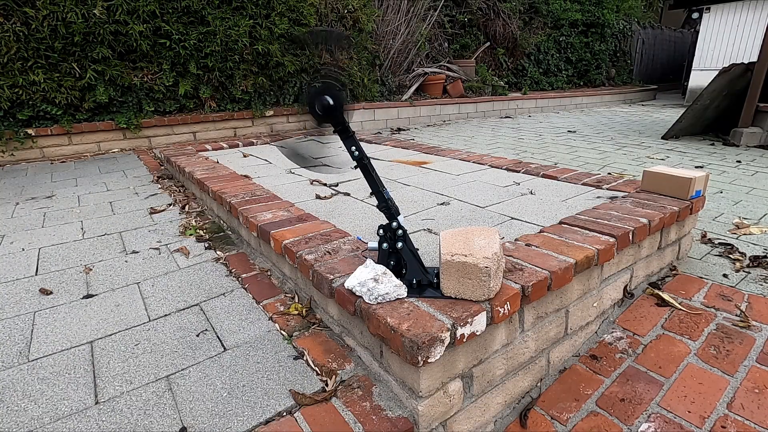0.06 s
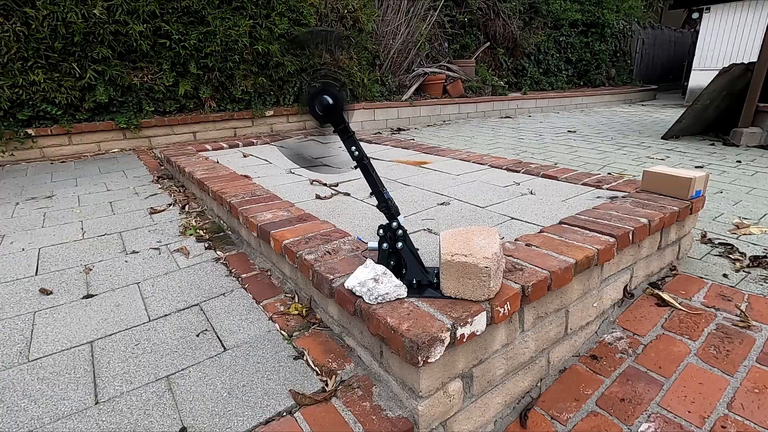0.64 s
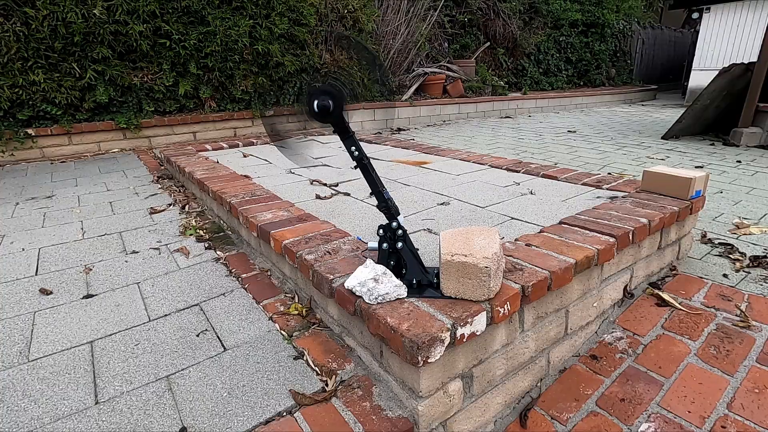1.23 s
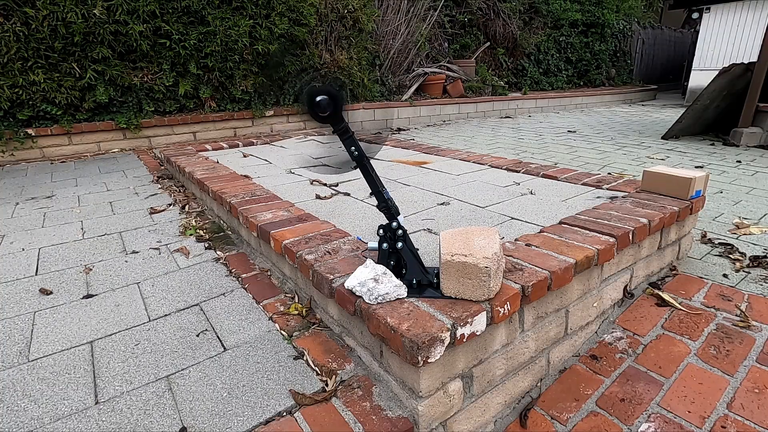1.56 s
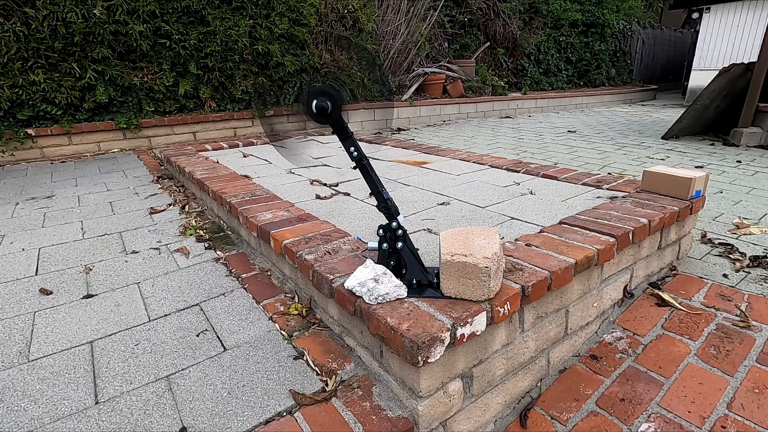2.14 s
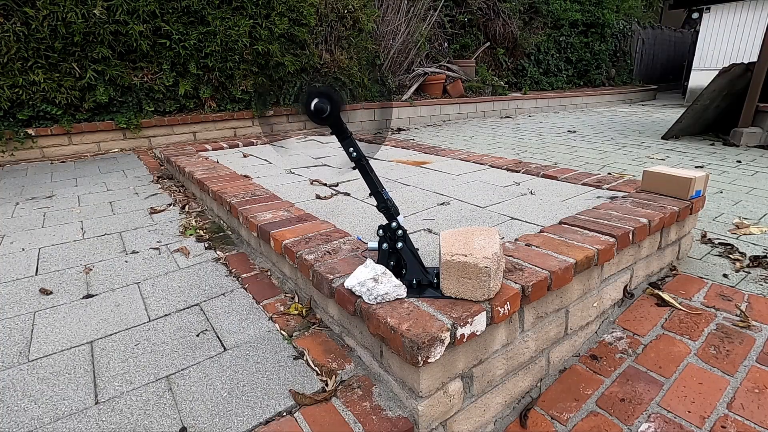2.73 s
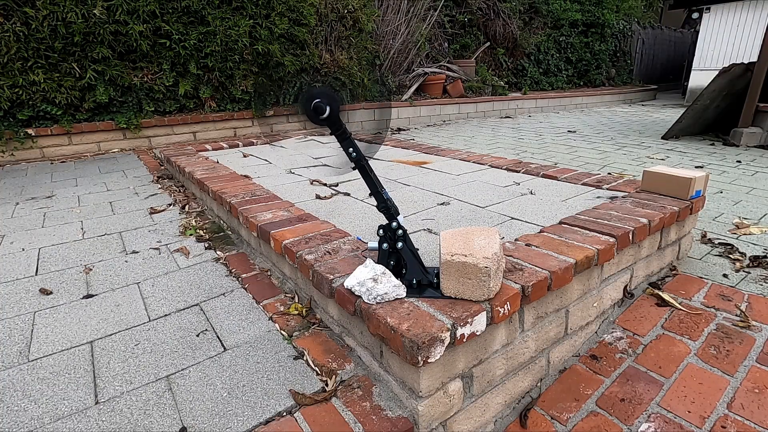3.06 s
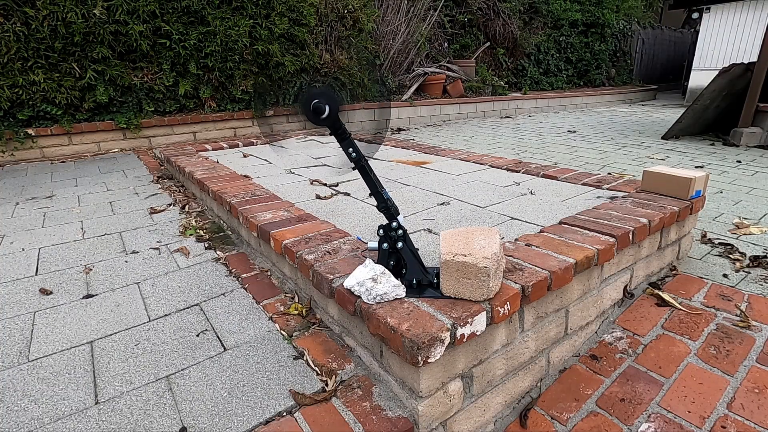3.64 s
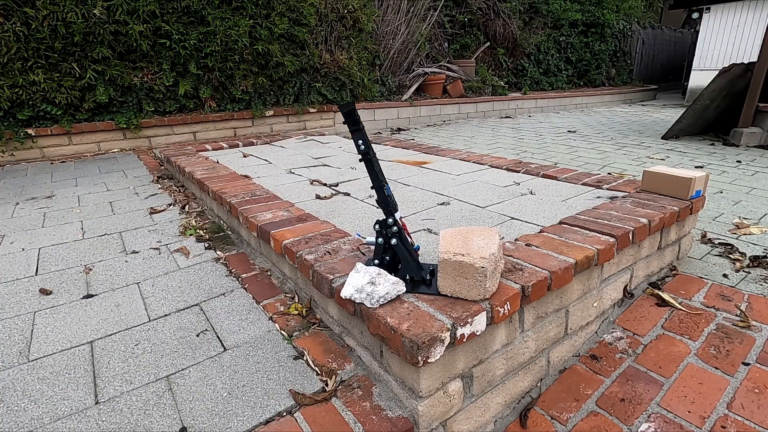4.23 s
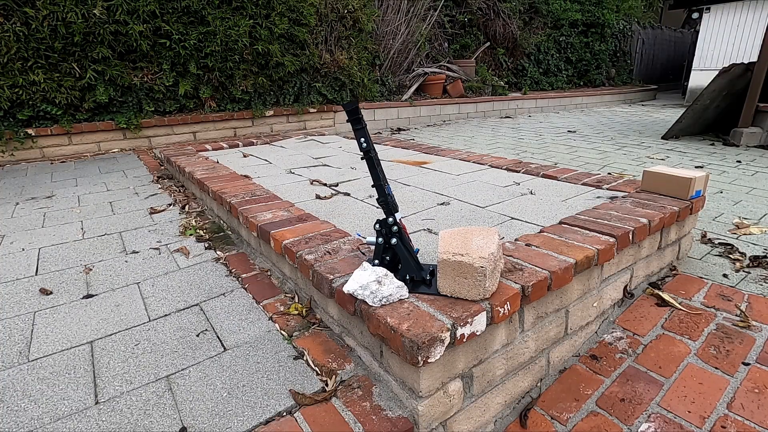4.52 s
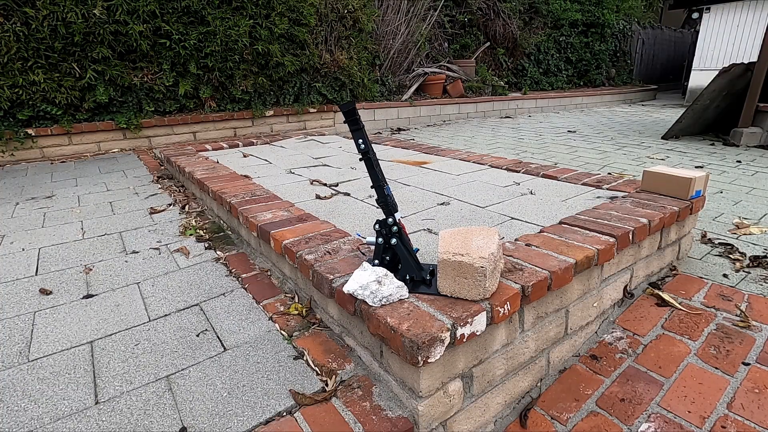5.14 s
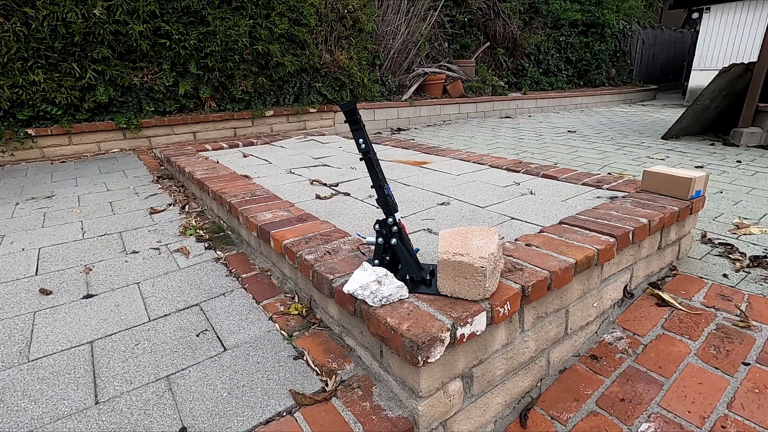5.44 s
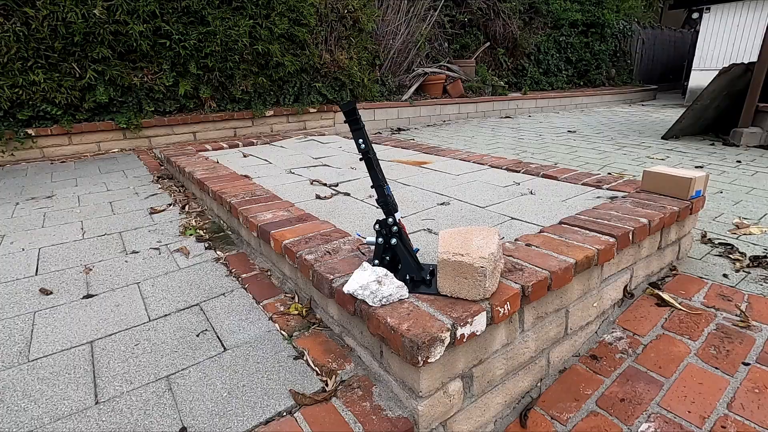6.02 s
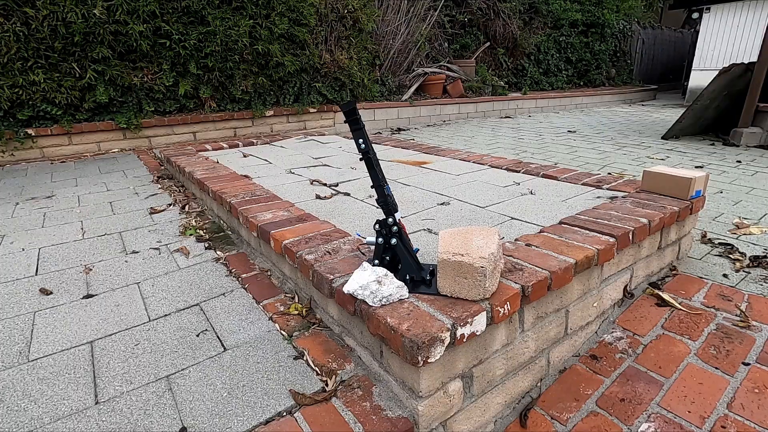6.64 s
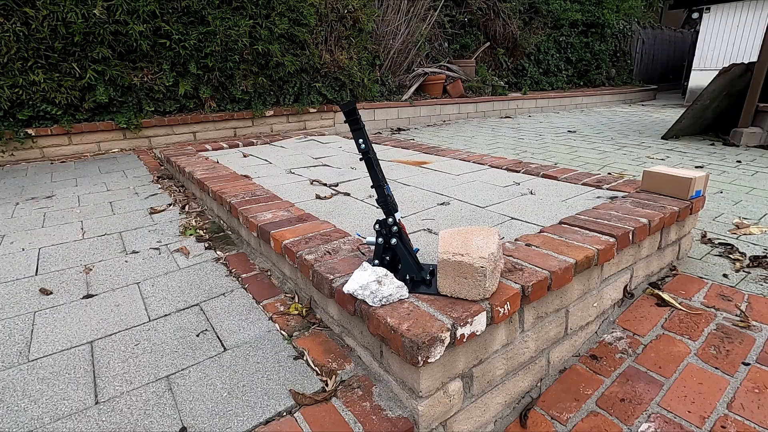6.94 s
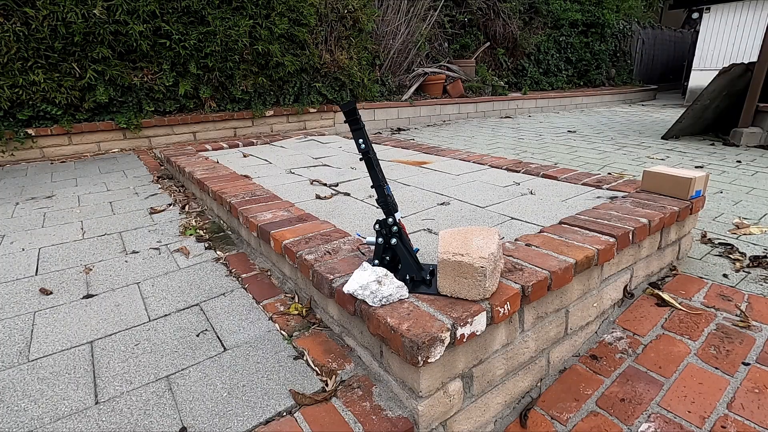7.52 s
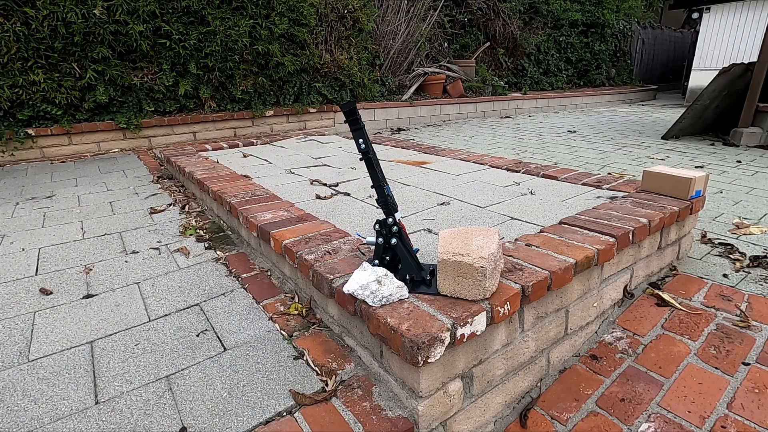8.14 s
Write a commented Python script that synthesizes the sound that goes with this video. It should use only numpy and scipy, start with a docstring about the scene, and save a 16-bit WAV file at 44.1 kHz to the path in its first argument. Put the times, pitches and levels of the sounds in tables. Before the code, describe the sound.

A motorised spinning bar hums and whines faster, cracks off its mast, and its pieces clatter over brick and paving outdoors.

```python
"""Spinning bar breaks up in a yard

A two-armed bar on a motorised mast spins up in a paved yard, heard on a spaced pair of microphones:
blade hum, torn air, motor whine and a rattle once a turn. The rattle grows until the hub cracks off;
the mast shudders and the pieces clatter over brick and paving. Walls answer each blow, dry leaves stir,
and a low, distant rumble remains."""
import sys
import numpy as np
from scipy import signal
from scipy.fft import rfft, irfft, next_fast_len
from scipy.io import wavfile
from scipy.ndimage import map_coordinates

SR = 44100
rng = np.random.default_rng(int(sys.argv[2]) if len(sys.argv) > 2 else 0)


def persist_wave(psi):
    """Save psi, clipped to +-1, as 16-bit WAV."""
    counts = np.round(np.clip(psi, -1, 1) * 32767).astype(np.int16)
    wavfile.write(sys.argv[1], SR, np.atleast_2d(counts).T)


N = 369558
TIME = np.arange(N) / SR
START_HZ = 45.39  # shaft turns per second at the outset
FAIL_S, BREAK_S = 4.1, 4.19  # the hub gives way, then comes off
FALL_DB_PER_S = 79.5  # air and rattle fade once it gives way

# Spectrum of the grinding hub: (frequency [Hz], density [dB])
GRIND = [(600, -20.5), (1500, -5), (2700, 8.5), (3550, 8.5), (4200, -2.5), (5200, -6), (7200, -9.5),
         (8600, -9), (9600, -26), (12500, -31), (14500, -44), (15500, -54)]
# How alike the two microphones hear a noise: (frequency [Hz], correlation [0-1])
LIKENESS = [(60, 0.84), (180, 0.98), (550, 1), (1650, 0.98), (4970, 0.75), (15000, 0.33)]


def rotor():
    """Hum, whine, air and rattle follow the shaft and cut out as the hub comes off."""
    # Balance at the microphones: (frequency [Hz], left minus right [dB])
    balance = [(60, -3.5), (110, 0.5), (200, -1.5), (380, -1.5), (700, -1.5), (1290, -2), (2380, -1.0),
               (4400, -1), (8120, -5), (15000, -3.5)]
    speed = shaft_speed()
    angle = 2 * np.pi * np.cumsum(speed) / SR
    wear = np.exp(np.minimum(TIME - FAIL_S, 0) / 0.067)  # runs away from 0 to 1
    sound = (blade_hum(speed, angle, wear) + motor_whine(angle)
             + torn_air(speed, angle, wear) + hub_rattle(speed, angle, wear))
    held = np.interp(TIME, [BREAK_S - .03, BREAK_S, BREAK_S + .02], [1, .6, 0])
    return filtered(held * sound, lambda hz: amp(along(balance, hz) * np.array([[.5], [-.5]])))


def shaft_speed(creep_hz_per_s=1.83, throttle_s=1.56, top_hz=61.96, spin_up_s=1.05):
    """Turns per second: a slow creep, then at full throttle an approach to top speed."""
    creep = START_HZ + creep_hz_per_s * np.minimum(TIME, throttle_s)
    return top_hz + (creep - top_hz) * np.exp(-since(throttle_s) / spin_up_s)


def blade_hum(speed, angle, wear):
    """Each arm pushes a pressure wave; turbulence shakes the partials in phase and level."""
    # Partials, the half order from imbalance: (multiple of blade rate, level [dB], flutter [rad])
    partials = [(.5, -21, 0.33), (1, -2, 0.029), (2, -4.5, 0.073), (3, -8, .2), (4, -6, 0.8), (5, -3.5, .9),
                (6, -6, 0.16), (7, -16, 0.47), (8, -18.5, 0.35), (10, -16, 0.53)]
    # Hum against shaft speed: (speed [turns/s], level [dB])
    loudness = [(45.5, -32), (48.5, -28.5), (54.6, -26), (60.6, -27)]
    hum_db = along(loudness, speed) - 449.5 * since(FAIL_S)
    throb_db = 2 * wobble(23.98)  # the bar cuts its own wake
    choke_db = 2 * wear ** 2  # the wobbling bar loses its upper partials
    hum = 0
    for k, db, flutter in partials:
        level_db = hum_db + db - k * choke_db + min(flutter / 0.46, 1) * throb_db
        gain = amp(level_db + 2 * flutter * wobble(16)) * np.sqrt(2)
        hum += gain * np.sin(2 * k * angle + rng.uniform(0, 2 * np.pi) + flutter * wobble(30))
    return hum


def motor_whine(angle, switching_hz=8030, surge_s=1.74):
    """Magnetic whine swells as the motor pulls, over the tones of its speed controller."""
    # Magnetic orders: (multiple of shaft rate, level [dB], swell under load [dB])
    orders = [(42, -47, 11), (45.9, -55.5, 5), (50.1, -51, 10), (80, -59, 11), (83.8, -57, 17.5)]
    # Steady controller tones: (frequency [Hz], level [dB])
    tones = [(7340, -68), (7840, -71), (7982, -67), (8031, -62), (8680, -64.5), (8870, -64.5), (13700, -79)]
    pull = np.exp(-((TIME - 1.91) / 0.45) ** 2)
    whine = sum(amp(db + swell_db * pull + 1.5 * wobble(25)) * np.sin(k * angle + .45 * wobble(60))
                for k, db, swell_db in orders)
    # switching beats with commutation: a falling tone that surges as the throttle opens, then dies
    beat_phase = 2 * np.pi * switching_hz * TIME - 84 * angle
    beat_db = -52 + 14.5 * np.exp(-((TIME - surge_s) / 0.18) ** 2) - 90 * since(surge_s)
    beat = amp(beat_db + 1.9 * wobble(12.7)) * np.sin(beat_phase + .5 * wobble(50.2))
    controller = sum(amp(db + 3 + 2 * wobble(6)) * np.sin(2 * np.pi * hz * TIME + 1.3 * wobble(50))
                     for hz, db in tones)
    return whine + beat + controller


def torn_air(speed, angle, wear, db_per_octave=8.5):
    """Eddies pass faster as the bar speeds up, and swish as each arm comes round."""
    # Eddies at the starting speed: (frequency [Hz], density [dB])
    spectrum = [(25, -25.5), (150, -11), (270, -4.5), (370, -1.4), (490, -5), (620, -7.5), (780, -10),
                (920, -5), (1030, -8.5), (1220, -9.5), (1310, -5.5), (1450, -12), (1800, -15),
                (2700, -20.5), (3800, -26.5), (5200, -34.5), (8000, -38.5), (12000, -49), (14000, -52.5),
                (16000, -62)]
    # Modes of the shaking mast head: (frequency [Hz], width [Hz], level [dB])
    head_modes = [(2656, 110, 0), (1350, 75, 2.5), (8650, 400, -13)]
    travel = np.cumsum(speed / speed[0])
    wake = noise(spectrum, LIKENESS, int(travel[-1]) + 1)
    eddies = np.array([map_coordinates(side, [travel]) for side in wake])
    swish = unit(amp(.6 * np.cos(2 * angle) + 0.8 * np.cos(4 * angle) + 0.7 * wobble(20)))
    head = amp(-15.5) * resonate(noise(GRIND, LIKENESS), head_modes)
    air_db = -26 + db_per_octave * np.log2(speed / START_HZ) - 4 * wear - FALL_DB_PER_S * since(FAIL_S)
    return amp(air_db) * swish * (eddies + head)


def hub_rattle(speed, angle, wear, db_per_octave=18, loose_hz=(53.5, 56.5)):
    """Near top speed the hub works loose and ticks once a turn over a steady grind."""
    # The hub's tick: (frequency [Hz], density [dB])
    tick_spectrum = [(600, -26), (1500, -9), (2600, 1), (3150, 0), (3550, 7), (4000, -2), (4600, -7),
                     (5700, -6.5), (6800, -14), (8600, -14.5), (10000, -27), (15000, -54)]
    looseness = np.interp(speed, loose_hz, [.15, 1])
    age_s = (angle / (2 * np.pi) % 1) / speed
    ticks = 4.1 * looseness * (1 - np.exp(-age_s / .0003)) * np.exp(-age_s / .0017) * amp(wobble(60))
    grind = .55 * amp(1.3 * wobble(250))
    hub_db = -42 + db_per_octave * np.log2(speed / START_HZ) + 8 * wear - FALL_DB_PER_S * since(FAIL_S)
    return amp(hub_db) * (grind * noise(GRIND, LIKENESS) + ticks * noise(tick_spectrum, LIKENESS))


def hub_cracks(ring_t60=0.034, snap_t60=0.0051):
    """The hub tears in a run of cracks, each a hard snap and a short ring."""
    # Cracks: (time [s], level [dB])
    cracks = [(3.883, -21), (3.966, -19), (3.973, -18), (3.982, -17), (3.999, -16), (4.033, -14.5),
              (4.047, -14), (4.057, -14.5), (4.068, -12), (4.0846, -11.5), (4.094, -14), (4.103, -16),
              (4.111, -12.5), (4.118, -14), (4.1298, -7), (4.1634, -8.5), (4.1747, -11), (4.182, -8.5),
              (4.23, -18), (4.25, -27.5)]
    spectrum = [(200, -13), (900, -2.5), (2400, 2), (4500, -4), (8500, -15), (15000, -32.5), (17000, -49)]
    out, t = np.zeros((2, N)), TIME[:SR // 4]
    for s, db in cracks:
        fade = amp(-60 * t / ring_t60) + amp(-1.5 - 60 * t / snap_t60)
        crack = amp(db - 5) * fade * noise(spectrum, LIKENESS, len(t))
        add(out, s, crack)
        add(out, s, amp(-15) * wall_echo(crack))
    return out


def mast_shudder(sway_hz=79.3):
    """At each jolt the mast's joints thud, its bending modes ring and it recoils on its base."""
    # Jolts: (time [s], shudder [dB], sway [dB], t60 [s])
    jolts = [(4.121, -15.5, -27, .16), (4.135, -19, -32, .16), (4.165, -11.5, -28, .12),
             (4.178, -18, -28, .08), (4.191, -27, -15, 0.083), (4.231, -12.5, -26, 0.047),
             (4.247, -31, -36, .2)]
    # Bending modes: (frequency [Hz], level [dB])
    bending = [(171, -5), (208, -5.5), (273, -11)]
    thud_spectrum = [(25, -11), (70, 1), (220, 1.5), (350, -11), (600, -33.5), (2000, -88.5)]
    out, t = np.zeros((2, N)), TIME[:SR // 4]
    for s, db, sway_db, t60 in jolts:
        thud = amp(-6.5 - 60 * t / t60) * noise(thud_spectrum, [(100, 0.88)], len(t))
        shudder = ring([(hz, level, t60) for hz, level in bending], t, scatter_db=1, drift=3)
        sway = amp(sway_db - 60 * (t / t60) ** 2) * np.sin(2 * np.pi * sway_hz * t)
        add(out, s, (1 - np.exp(-t / 0.0025)) * (amp(db) * (shudder + thud) + sway))
    return out


def falling_pieces():
    """Each piece clacks with a colour set by its size, knocks the ground and wakes the walls."""
    # Landings: (time [s], level [dB], centre [Hz], knock [dB], left minus right [dB], echo [dB])
    landings = [(4.285, -27, 1290, -12.5, -3, -2.5), (4.311, -36, 2200, -18, 0, -10),
                (4.348, -30, 2380, -19, 1.5, -20), (4.393, -20, 1750, -27, -4.5, -9),
                (4.409, -13.5, 2100, -24, -1.5, -29.5), (4.453, -35, 3800, -4, 0, -12),
                (4.483, -21, 2200, -16, 0, -17), (4.505, -11.5, 3610, -25.5, 7.5, -5.5),
                (4.566, -34.5, 1000, -16, 0, -12), (4.59, -23.5, 1700, -16, -1, -10.5),
                (4.599, -21.5, 3600, -19, -1.5, -6), (4.637, -33.5, 3800, -20, -0.5, -8),
                (4.725, -21.5, 1590, -17, -1, -7), (4.746, -31, 2400, -15, -1, -4),
                (4.791, -33.5, 2510, -12, 0.5, -5.5), (4.949, -45, 2210, -11, 2, -20),
                (4.999, -46, 4800, -25, -0.5, -8), (5.259, -26, 1200, -7, -2, -9),
                (5.271, -21, 1450, -7, -2, -2), (5.272, -23.5, 3400, -22, -2, -3),
                (5.3, -35, 1150, -3, -1, -6), (5.353, -36, 1200, -9, -1, -8),
                (5.394, -20, 1600, -10, 1, -9), (5.403, -31, 1900, 3, -1, -5.5),
                (5.417, -34.5, 1400, 2.5, -1, -5), (5.455, -37, 1300, 1.5, -1, -7),
                (5.566, -46.5, 3600, -20, -0.5, -3.5), (5.633, -37, 2500, -25, 2.5, -11.5),
                (5.73, -35, 1500, -13, -4.5, -5), (5.745, -28, 1900, -9, -2, 3.5),
                (5.951, -35.5, 2600, -13, -5.5, -17), (6.044, -33.5, 2620, -13, -7, 1),
                (6.057, -38, 3400, -14.5, -6, -7), (6.121, -43, 2400, -15, -3.5, -8),
                (6.157, -26.5, 1400, -18.5, 0.5, -17.5), (6.162, -13.5, 1750, -14, -3.5, -9),
                (6.293, -28.5, 2700, -14, -4.5, -3.5), (6.398, -28.5, 2500, -7, -4.5, -6),
                (6.5, -35.5, 2020, -0.5, -.5, 0.5), (6.684, -33, 2490, -5, -3, -7),
                (6.71, -36.5, 1800, -5, -3, -5.5), (6.869, -34, 2420, -12, -3.5, -5),
                (6.932, -43, 2400, -11, -3, -4.5), (7.194, -48, 2210, -16, -3.5, -8),
                (7.247, -41, 2400, -12, -.5, -11)]
    ground = [(50, -4), (180, 7), (480, -3), (750, -13), (1200, -18), (4000, -67.5)]
    out, t = np.zeros((2, N)), TIME[:SR // 4]
    for s, db, hz, knock_db, lr_db, echo_db in landings + chips(count=5):
        t60 = 0.036 * 2 ** ((-24 - db) / 25.5)  # softer blows last longer
        crunch = unit(amp(2 * wobble(700)[:len(t)]))  # many tiny contacts
        clack = amp(-60 * t / t60) * crunch * noise(fragment(hz), [(800, 0.85), (5000, 0.91)], len(t))
        knock = amp(knock_db - 1.5 - 60 * t / 0.06) * noise(ground, [(200, 1)], len(t))
        blow = amp(db - 3) * (clack + knock) * (1 - np.exp(-t / 0.0003))
        add(out, s, placed(blow, lr_db))
        add(out, s, amp(echo_db + 1.5) * wall_echo(blow) * panned(-1))
    return out


def chips(count, start_s=4.8, span_s=0.32):
    """Landing rows for light chips that patter down at random; bigger ones are louder and lower."""
    return [(start_s + span_s * (k + when) / count, -53.5 + 4 * (size - .5), 4790 * 2 ** (.5 - size),
             -27, 8 * (side - .5), -3) for k, (when, size, side) in enumerate(rng.random((count, 3)))]


def fragment(hz, ring_db=5, relative_width=0.055):
    """The spectrum of one piece: a hump set by its size, with a few resonances of its own."""
    hump = [(hz / 8, -26), (hz / 3.8, -15), (hz / 1.85, -1), (hz, 0),
            (hz * 2, -5.5), (hz * 3, -16), (hz * 5, -28), (hz * 9, -46)]
    grid = np.geomspace(100, 16000, 400)
    modes = hz * np.array([.62, 1, 1.6, 2.4]) * np.exp(.07 * rng.standard_normal(4))
    peaks = sum(1 / (1 + ((grid / mode - 1) / relative_width) ** 2) for mode in modes)
    return np.transpose([grid, along(hump, grid) + ring_db * peaks])


def steel_clink():
    """Off to the left a small steel part strikes brick; brief chatter roughens its ring."""
    # Strikes: (time [s], level [dB], left minus right [dB])
    strikes = [(5.655, -9, 9.5)]
    # The part's modes: (frequency [Hz], width [Hz], level [dB])
    modes = [(1730, 90, -15), (2440, 70, -16), (2720, 90, -16), (3690, 75, 3), (4090, 200, -9),
             (4580, 160, -13), (5800, 190, -14), (6680, 130, -11.5), (8440, 300, -22)]
    spectrum = [(400, -34), (800, -16), (1500, 9.5), (3200, 7), (3850, 16),
                (5300, -2), (9000, -13), (15000, -19), (17000, -44.5)]
    low_cut = signal.butter(4, 1100, "high", fs=SR, output="sos")  # too small to radiate bass
    out, t = np.zeros((2, N)), TIME[:SR // 2]
    for s, db, lr_db in strikes:
        contact = amp(db - 0.5 - 60 * t / 0.0045) * noise(spectrum, [(3000, 0.43)], len(t))
        tick = signal.sosfilt(low_cut, contact)
        chatter = (t == 0) + amp(-28 - 60 * t / .07) * rng.standard_normal(len(t))
        clink = amp(db - 29.5) * signal.sosfilt(low_cut, resonate(chatter, modes))
        add(out, s, (tick + clink) * panned(lr_db))
        add(out, s, (amp(-8.5) * wall_echo(clink) + amp(-4.5) * wall_echo(tick)) * panned(3))
    return out


def thrown_bar():
    """The heavy bar comes down right of centre, clangs, bounces and skids on the paving."""
    # Bounces: (time [s], skid [dB], skid t60 [s], clang [dB])
    bounces = [(6.161, -18.5, .11, -23), (6.187, -25.5, .15, -31), (6.225, -32.5, .15, -37),
               (6.292, -35, .18, -50), (6.332, -34, 0.2, -50), (6.387, -34, 0.16, -45.5),
               (6.415, -35.5, .14, -48), (6.51, -43.5, .2, -45.5), (6.62, -44, 0.17, -53),
               (6.64, -45, .12, -49), (6.684, -38.5, .2, -41), (6.869, -47.5, .15, -55)]
    # Modes while scraping: (frequency [Hz], width [Hz], level [dB])
    skid_modes = [(1222, 95, -2.5), (1740, 640, -6.5), (2550, 260, -1), (2745, 130, 2.5), (3550, 260, -4.5),
                  (4100, 260, -4), (5240, 800, -10), (7710, 3200, -17.5)]
    # Free ring after a blow: (frequency [Hz], level [dB], t60 [s])
    clang_modes = [(1120, -3, .05), (1228.4, -4, .15), (1480, -3, .045), (2720, -5, .11)]
    grit_spectrum = [(300, -22), (700, -15), (1100, -2), (9000, 0), (15000, -3)]
    out, t = np.zeros((2, N)), TIME[:SR // 2]
    for s, db, t60, clang_db in bounces:
        catches = unit(amp(3 * wobble(500) + 3.5 * wobble(130))[:len(t)])
        grit = catches * noise(grit_spectrum, LIKENESS, len(t))
        skid = amp(db - 60 * t / t60) * resonate(grit, skid_modes)
        clang = amp(clang_db) * ring(clang_modes, t, scatter_db=1.5, drift=9)
        add(out, s, placed(skid + clang, -2.5))
        add(out, s, amp(-3) * wall_echo(skid + clang) * panned(-1.8))
    return out


def wall_echo(sound, build_s=0.0023):
    """A fresh diffuse tail that builds up as the yard's walls reply."""
    # Decay of the yard: (frequency [Hz], t60 [s])
    decay = [(200, 0.65), (1200, 0.51), (4000, 0.62), (12000, 0.4)]
    diffuse = noise([(100, 0.0019), (15000, 0.011)], [(300, 0.97), (1500, 0.26)], SR * 3 // 4)
    hz, t, bands = signal.stft(diffuse, SR, nperseg=256)
    envelope = amp(-60 * t / along(decay, hz)[:, None]) * (1 - np.exp(-t / build_s))
    tail = signal.istft(bands * envelope, SR, nperseg=256)[1]
    return signal.fftconvolve(np.atleast_2d(sound)[:1], tail / np.linalg.norm(tail[0]), axes=1)


def dry_leaves(rise_s=0.036, floor_db=-67.5):
    """Leaves and grit crackle in short rustles after the break, over a faint hiss."""
    # Rustles: (time [s], level [dB], t60 [s])
    rustles = [(4.49, -43, 0.7), (5.27, -33.5, 0.75), (5.76, -46.5, 1.7), (6.29, -36, 1.47),
               (6.8, -56, 1.5), (7.35, -57, 2.3), (8.09, -56.5, 1.14)]
    # Leaf crackle: (frequency [Hz], density [dB])
    spectrum = [(410, -44), (700, -17), (880, -10), (1250, -3.5), (2830, -8), (6690, -14), (8530, -18.5),
                (15000, -37)]
    stir = sum(amp(db - 60 * since(s) / t60) * (1 - np.exp(-since(s) / rise_s)) for s, db, t60 in rustles)
    grains = unit(amp(2.6 * wobble(400) + 1.5 * wobble(25)))
    return amp(-4) * (stir + amp(floor_db)) * grains * noise(spectrum, [(1000, 0.33), (5000, 0.083)])


def distant_rumble():
    """Low outdoor rumble, nearly the same at both microphones, swelling towards the end."""
    # The swell: (time [s], level [dB])
    swell = [(4.6, -59.5), (5.1, -59.5), (5.47, -55.5), (6.06, -57), (7.74, -49), (8.38, -50)]
    # The rumble: (frequency [Hz], density [dB])
    spectrum = [(13, -42.5), (22, -10), (54, -2), (135, -7.5), (256, -20), (377, -23), (462, -23.5),
                (484, -27.5), (900, -52.5), (1170, -83), (1980, -120)]
    level_db = np.interp(TIME, *np.transpose(swell))
    return amp(level_db + 1.5 + 1.9 * wobble(22)) * noise(spectrum, [(30, 1), (100, 0.93)])


def amp(db):
    """Decibels to gain."""
    return 10 ** (np.asarray(db) / 20)


def unit(x):
    """Scale to rms 1."""
    return x / np.sqrt(np.mean(x ** 2) + 1e-20)


def since(s):
    """Seconds since time s, zero before it."""
    return np.maximum(TIME - s, 0)


def along(points, hz):
    """Interpolate (frequency [Hz], value) points on a log axis."""
    f, v = np.transpose(points)
    return np.interp(np.log(hz + 1), np.log(f + 1), v)


def wobble(rate):
    """A smooth random curve, rate knots a second."""
    return map_coordinates(rng.standard_normal(int(N * rate / SR) + 4), [TIME * rate])


def filtered(x, response):
    """x through a frequency response."""
    n = x.shape[-1]
    m = next_fast_len(n + SR // 8)
    return irfft(rfft(x, m) * response(np.fft.rfftfreq(m, 1 / SR)), m)[..., :n]


def noise(spectrum, likeness, size=N):
    """Stereo noise of rms 1 from (frequency [Hz], density [dB]) points and a left-right likeness."""
    def response(hz):
        turn = np.arccos(np.clip(along(likeness, hz), -1, 1)) / 2
        return amp(along(spectrum, hz)) * np.array([np.cos(turn), np.sin(turn)])
    mid, side = filtered(rng.standard_normal((2, size)), response)
    return unit(np.array([mid + side, mid - side]))


def resonate(x, modes):
    """x through (frequency [Hz], width [Hz], level [dB]) resonances, at rms 1."""
    return unit(filtered(x, lambda f: sum(
        (-1) ** k * amp(db) * 1j * f * width / (hz * hz - f * f + 1j * f * width)
        for k, (hz, width, db) in enumerate(modes))))


def ring(modes, t, scatter_db, drift):
    """Damped modes, struck at new strengths each time; their phase drifts as the contact shifts."""
    out = 0
    for hz, db, t60 in modes:
        fade = amp(db + scatter_db * rng.normal() - 60 * t / t60)
        wander = drift * np.cumsum(rng.standard_normal(len(t))) / np.sqrt(SR)
        out += fade * np.sin(2 * np.pi * hz * t + wander)
    return out


def panned(lr_db):
    """Left and right gains."""
    return amp(np.array([[lr_db], [-lr_db]]) / 2)


def left_leads(sound, lead_s):
    """The left microphone hears the sound lead_s before the right."""
    return filtered(sound, lambda hz: np.exp(1j * np.pi * hz * lead_s * np.array([[1], [-1]])))


def placed(sound, lr_db):
    """A sound from one side reaches the far microphone softer and later."""
    return left_leads(sound * panned(lr_db), 1.2e-5 * lr_db)


def add(track, s, sound):
    """Mix a sound in at time s."""
    part = track[:, round(s * SR):][:, :sound.shape[-1]]
    part += sound[..., :part.shape[-1]]


def scene():
    """The mast a little right of centre, debris to both sides, the yard behind."""
    spin = rotor()
    fracture = (hub_cracks() + mast_shudder()) * panned(-1.8)
    debris = falling_pieces() + steel_clink() + thrown_bar()
    yard = (distant_rumble() + dry_leaves()) * panned(-1.1)
    return spin + fracture + debris + yard


def record(dry, ceiling=.85, top_hz=15800):
    """A spaced pair, the left slightly late; the recorder rounds off peaks and cuts the top treble."""
    heard = left_leads(dry, -2.6e-5)
    rounded = heard / (1 + np.abs(heard / ceiling) ** 6) ** (1 / 6)
    return filtered(rounded, lambda hz: hz < top_hz)


dry = scene()
out = record(dry)
persist_wave(out)
```